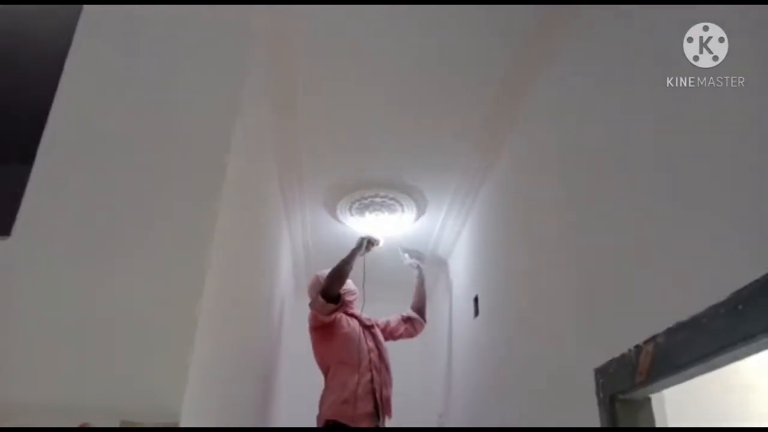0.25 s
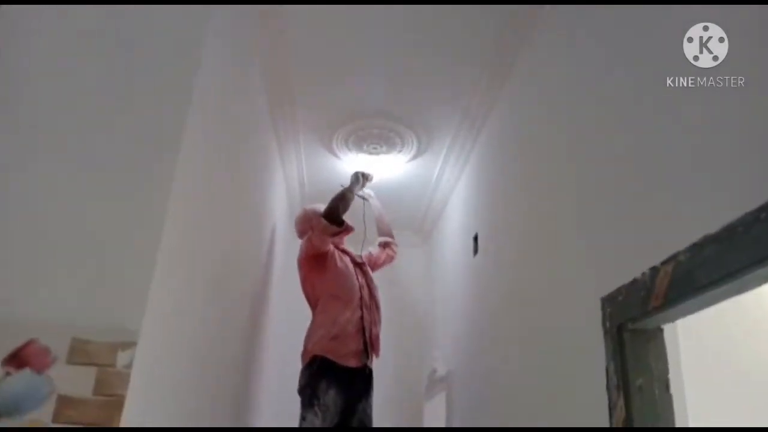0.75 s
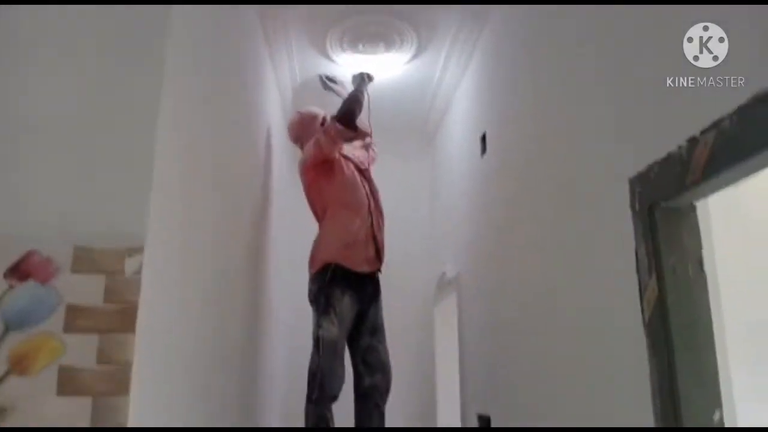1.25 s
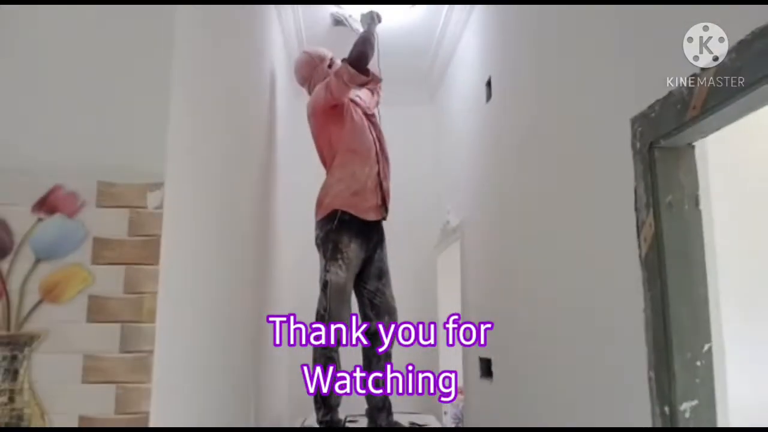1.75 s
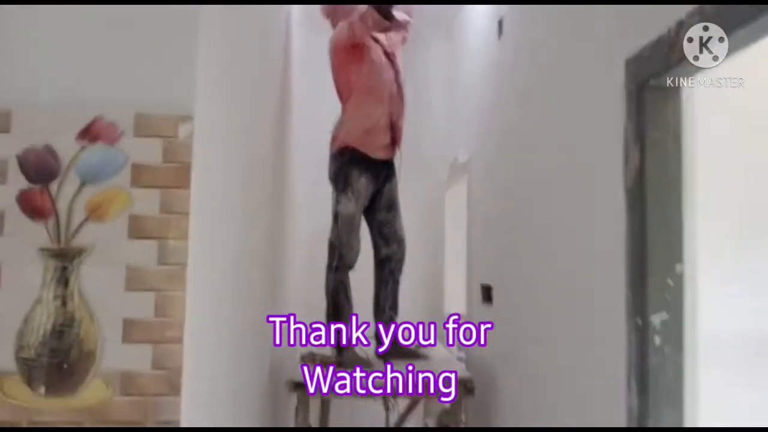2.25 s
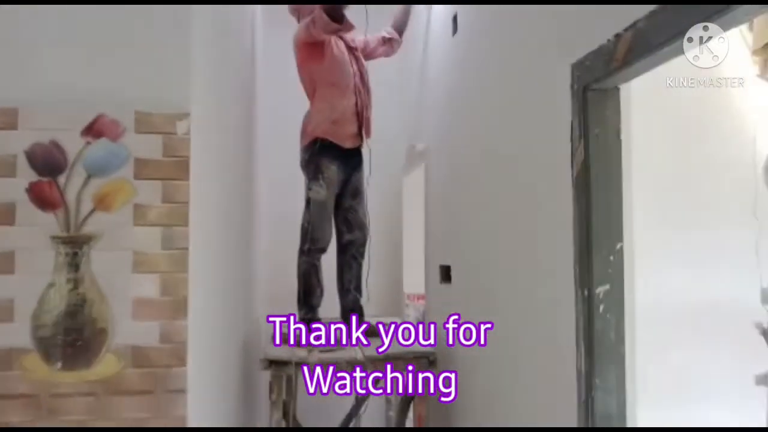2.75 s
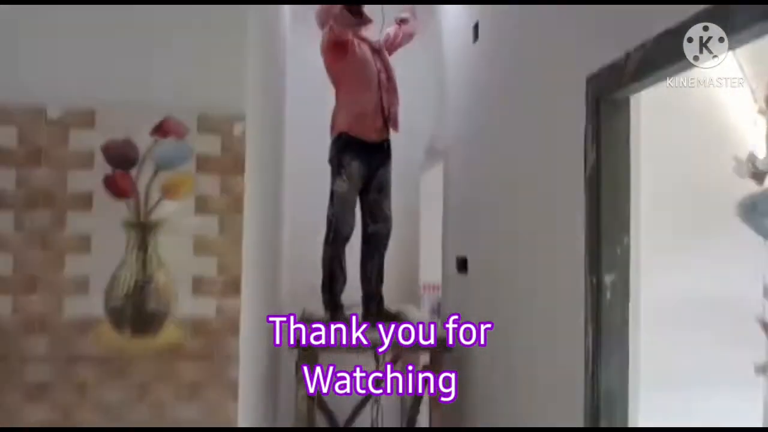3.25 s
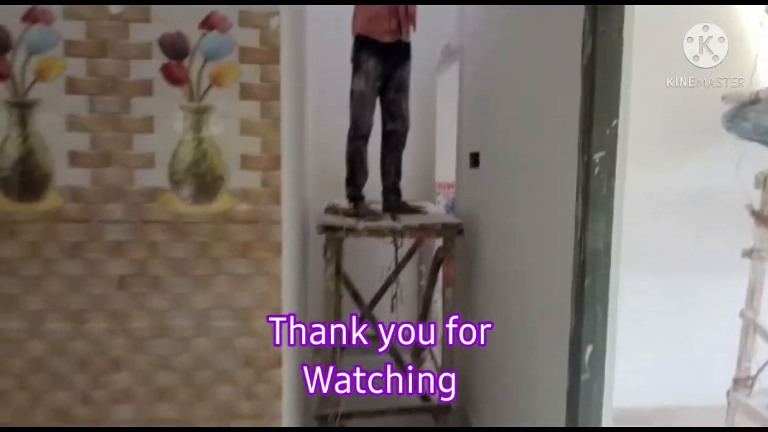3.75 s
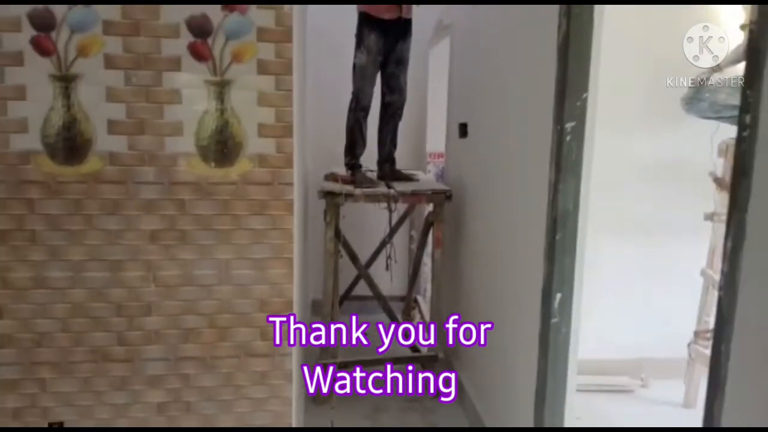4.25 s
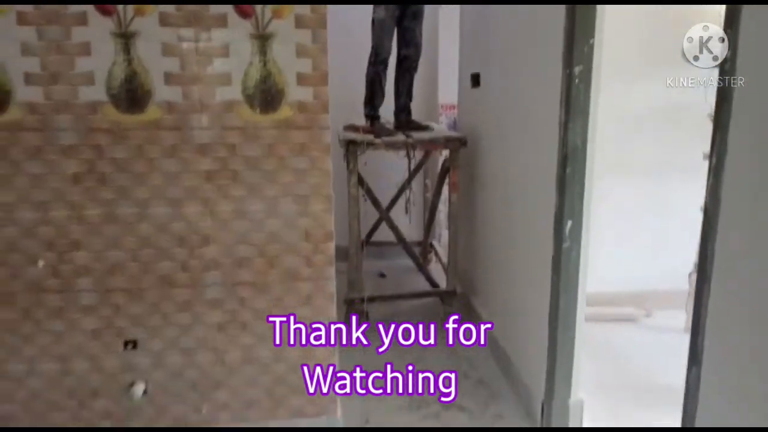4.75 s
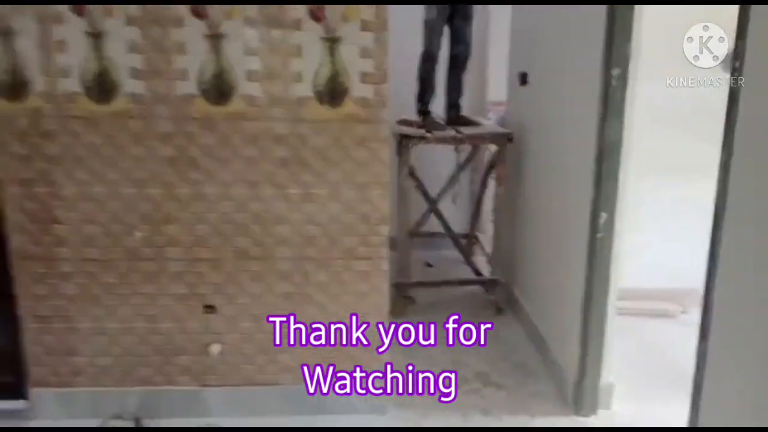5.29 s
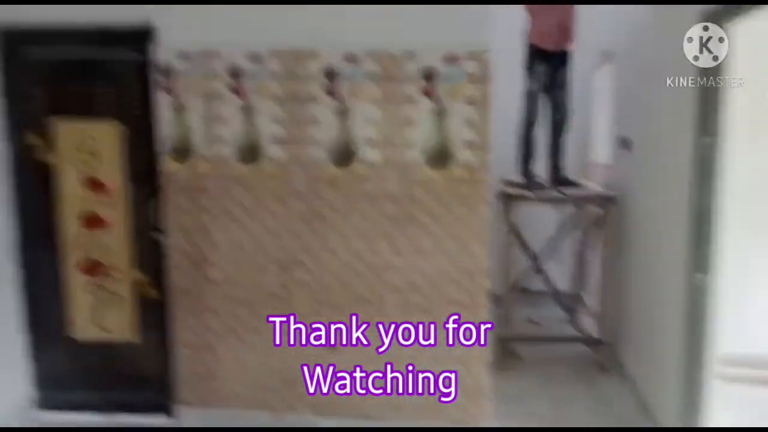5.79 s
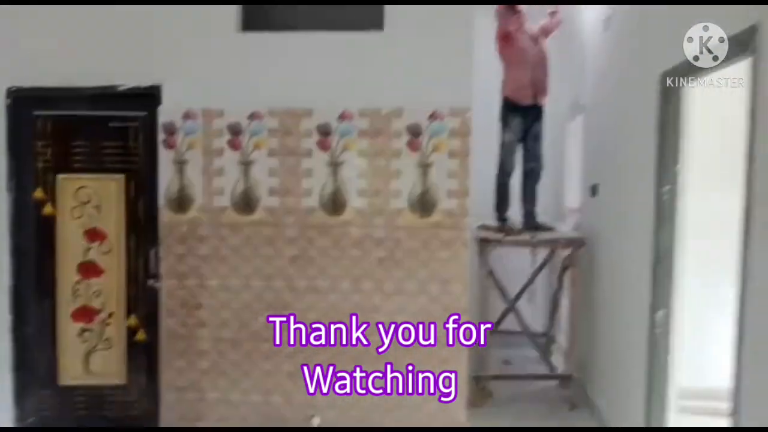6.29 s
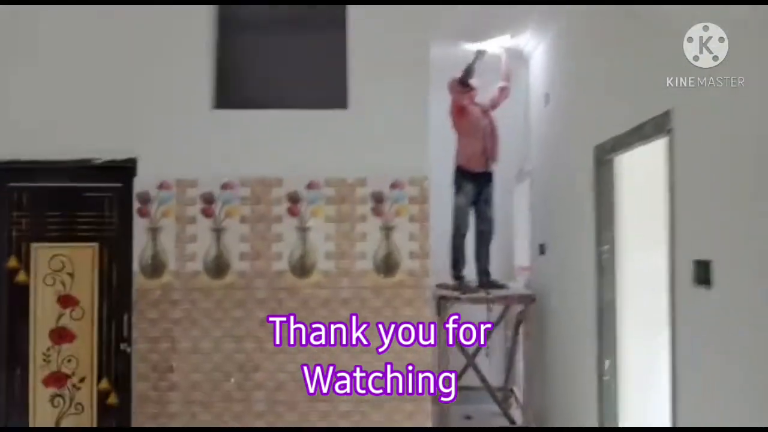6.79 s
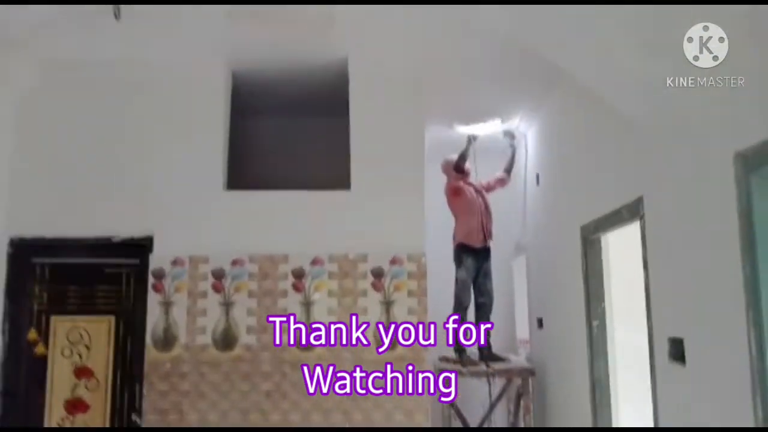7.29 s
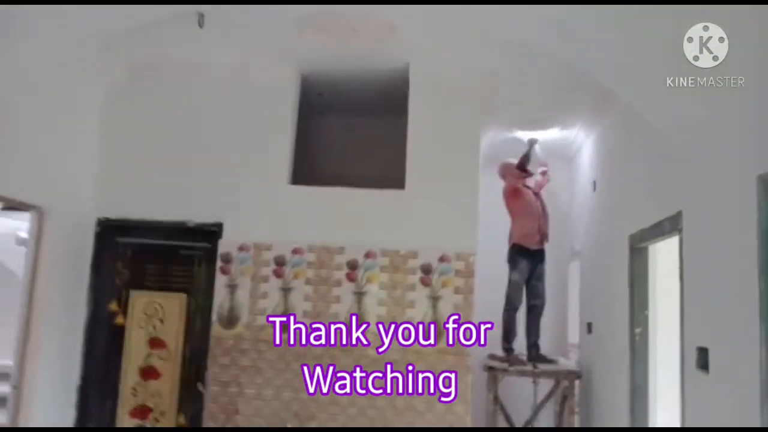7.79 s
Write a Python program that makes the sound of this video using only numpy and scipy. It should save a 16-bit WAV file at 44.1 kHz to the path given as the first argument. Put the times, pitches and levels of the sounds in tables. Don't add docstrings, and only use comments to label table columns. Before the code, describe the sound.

A bare plastered hall with hard echoes, heard in mono on a hand-held phone some metres from the work. At 0 s a sandpaper stroke is already ending, with low grip thuds. Until about 1.7 s only light scuffs, tiny grit ticks and a faint bump are heard over soft room air and low distant traffic with faint hoots and squeals. A rasp swells around 2 s, a fuller one at 2.5 s, then a lull near 3 s. From 3.5 to 5.5 s brisk, strong strokes come about every quarter second, gritty and bright. Around 5.7 s soft casing bumps begin, and by 6 s the rasp is muffled by a finger. At 6.25 s a sharp knuckle knock skids on the casing. Afterwards the scraping changes colour, with separate strokes at 6.7 and 7.1 s, and a weak last one near 7.9 s.

```python
import sys
import numpy as np
from scipy import signal
from scipy.fft import rfft, irfft
from scipy.io import wavfile
from scipy.ndimage import uniform_filter1d

SR = 44100
rng = np.random.default_rng(int(sys.argv[2]) if len(sys.argv) > 2 else 0)


def int16_out(signal):
    q = np.round(np.clip(np.atleast_2d(signal).T, -1, 1) * 32767)
    wavfile.write(sys.argv[1], SR, q.astype(np.int16))


def invert_db(level):
    return 10 ** (np.asarray(level, dtype=float) / 20)


N = 354123

# peak in seconds, rise and fall to 6 dB under it in seconds,
# force in dB, brightness in dB.
STROKES = [(0.034, 0.15, 0.044, -29.5, -1.5), (1.989, 0.17, 0.12, -36.5, -0.6),
           (2.529, 0.3, 0.12, -30.5, -2.4), (2.58, 0.16, 0.057, -38.5, 12), (3.367, 0.079, 0.026, -43, 0),
           (3.525, 0.042, 0.2, -33, -2.5), (3.68, 0.15, 0.102, -27.0, -0.2),
           (3.969, 0.098, 0.13, -26.5, -0.9), (4.228, 0.094, 0.093, -25.5, -0.5),
           (4.524, 0.11, 0.09, -26.5, -0.7), (4.76, 0.12, 0.087, -27, -0.4),
           (5.021, 0.12, 0.15, -26.5, 0.2), (5.31, 0.046, 0.25, -30.5, 3.5), (5.41, 0.26, 0.1, -28, -0.8),
           (5.86, 0.17, 0.18, -33, 1.8), (5.931, 0.009, 0.11, -36.5, -1), (6.213, 0.18, 0.018, -32.5, -0.5),
           (6.414, 0.07, 0.123, -39.5, 0), (6.67, 0.085, 0.19, -32.5, -1.3),
           (7.144, 0.18, 0.073, -32.5, -2), (7.718, 0.034, 0.096, -43.5, -4.5),
           (7.926, 0.2, 0.14, -38.5, -0.5)]
SCUFFS = [(0.44, 0.008, 0.046, -52.5, 0), (0.558, 0.006, 0.04, -58, 1), (0.647, 0.055, 0.047, -49.5, -0.2),
          (0.749, 0.009, 0.044, -62, -0.6), (1.059, 0.042, 0.057, -52, 0.5), (1.154, 0.026, 0.02, -60, -1),
          (1.377, 0.006, 0.757, -47.5, -2), (1.778, 0.27, 0.017, -45, 2), (3.083, 0.19, 0.15, -56, 1.5),
          (3.25, 0.008, 0.08, -52, 1.5), (7.68, 0.094, 0.053, -49.5, 1)]
STROKE_DROP_DB, STROKE_SQUARENESS, USUAL_FORCE_DB = 6.0, 2.33, -35
# steepness over speed, share of brightness, extra dB per dB of force,
# hall share 0-1, hall t60 in seconds.
LAYERS = [
    (.67, -1.3, -0.3841, 0.6, 0.97),
    (1.01, -0.091, 0.0134, 0.41, 0.89),
    (1.45, 0.97, 0.3746, 0.33, 0.7),
    (1.7, 1.14, 0.25, 0.45, 0.51),
]
# level facing the wall in dB, change when shaded in dB,
# change when turned in dB.
LAYERS_AT_PHONE = [
    (-6, -9, -2),
    (-0.12, 0.2, -0.25),
    (-1, -13, 6),
    (-10, -21.5, 6),
]
GRAINS_PER_S, GRAIN_SPREAD_DB, WET_DB = 5000, 0.5, -1.5
# time in seconds, share shaded 0-1, share turned aside 0-1.
PHONE_POSES = [(0.0, 0, .5), (.45, 0, 0), (5.69, 0, 0), (5.97, 1, 0), (6.18, 1, 0), (6.21, .83, .17),
               (6.3, 0, 1)]
# frequency in Hz, level in dB per Hz.
FACING = [(700, -33), (1480, -12), (2240, 0.5), (3200, -1), (4150, -2.5), (4600, -8), (5700, -11),
          (6410, -9), (7560, 2), (8320, -4), (9810, -16), (11200, -17), (14000, -10), (15200, -15.5)]
# frequency in Hz, level in dB per Hz.
SHADED = [(500, -47), (1050, -39), (1460, -23), (2000, -17.5), (2900, -4.5), (3700, 4.5), (4150, -1),
          (4600, -9), (5500, -12.5), (7600, -21), (10900, -31), (15200, -44)]
# frequency in Hz, level in dB per Hz.
ASIDE = [(290, -61), (500, -26), (704, -21), (898, -20), (1070, -21), (1150, -16), (1640, -8), (2210, -1),
         (3590, 2), (5360, -11), (8110, -1.5), (8960, -4), (10600, -12.5), (15200, -16.5)]
# frequency in Hz, t60 in seconds.
HALL_DECAY = [(300, 0.46), (2000, 0.75), (8000, 1), (15000, 0.59)]
HALL_FILLED = 1.4

# time in seconds, peak in dB, brightness in dB per octave.
BUMPS = [(1.371, -44, -1.5), (2.619, -44, -1.5), (5.768, -43, -3), (5.87, -41, -7), (5.904, -45, -1)]
# time in seconds, peak in dB.
KNUCKLE_SKID = [(6.23, -18.5), (6.236, -21), (6.243, -12.5), (6.246, -11.5), (6.254, -28), (6.258, -19.5),
                (6.263, -24), (6.269, -21), (6.273, -19), (6.286, -34), (6.299, -45)]
SKID_BRIGHT_DB, SKID_BRIGHT_PER_DB, SKID_USUAL_DB = -2.5, 0.06, -20
# frequency in Hz, level in dB per Hz.
CASING = [(24, -46), (40, -27), (285, -9.5), (572, -6), (733, -11), (916, -10.5), (3420, -14.5),
          (4850, -22), (7770, -15.5), (15200, -21)]
BUMP_T60_S, THUD_S = 0.037, 0.039
# time in seconds, peak in dB, push time in seconds.
TAPS = [(5.773, -31, .0004), (5.874, -36, .00045), (6.2478, -14, 0.00054)]
# time in seconds, peak in dB, frequency in Hz.
THUDS = [(.005, -49, 95), (.045, -40.5, 74.5), (.1, -54, 80), (.203, -46, 73), (.25, -51, 75),
         (.283, -47, 84), (.33, -45.5, 75), (5.657, -54, 89), (5.76, -55, 85), (5.87, -61, 110),
         (6.042, -59, 73)]
# time in seconds, peak in dB, frequency in Hz.
PINGS = [(1.407, -34, 7500), (3.034, -40.5, 9100)]
# time in seconds, peak in dB.
FLOOR_TICKS = [(0.4369, -38), (0.555, -36), (1.3747, -30), (1.3784, -44), (3.2446, -33)]

# loudest moment in seconds, approach in seconds, fade in dB per second, level in dB.
VEHICLES = [(0.02, 0.037, 45, -44), (.69, .08, 60, -55.5), (1.42, 0.02, 23, -48.5), (2.2, 0.52, 17, -50.5),
            (2.63, 0.022, 45, -44), (3.12, .2, 21, -58), (3.6, 0.11, 15, -58), (4.0, 0.6, 20, -55.5),
            (4.6, .12, 12, -54.5), (5.05, .2, 61, -58), (5.5, 0.092, 60, -48), (6.9, .3, 25, -69),
            (7.72, 0.038, 29, -52)]
STREET_REST_DB, APPROACH_DB = -74.5, 8.5
# frequency in Hz, level in dB per Hz.
STREET_TONE = [(24, -45), (40, -19), (128, -5), (407, -4), (469, -3.5), (533, -5.5), (699, -1.5),
               (1200, -1.5), (1560, -1), (2640, -120)]
# start in seconds, end in seconds, frequency in Hz,
# width in Hz, level in dB.
HOOTS = [(1.85, 2.3, 697, 18, -59.5), (2.65, 3.496, 670, 14, -66), (2.9, 3.3, 985, 20, -66),
         (4.49, 4.85, 830, 70, -56.5), (.58, 0.84, 490, 15, -65), (6.98, 7.25, 1100, 220, -54),
         (4.8, 5.12, 730, 60, -62), (1.85, 1.99, 478, 29, -61.5), (2.6, 2.9, 138, 25, -62),
         (2.3, 2.82, 1680, 160, -46), (3.0, 3.22, 1600, 30, -66), (1.39, 1.62, 2350, 500, -47),
         (1.66, 1.9, 1680, 120, -50), (1.02, 1.12, 2750, 400, -56)]
# frequency in Hz, level in dB per Hz.
AIR = [(15, -44), (25, -10), (93, -1.5), (147, -1), (203, -4), (258, -3), (817, -8.5), (2090, -3),
       (3570, -7), (5490, -21.5), (6620, -19.5), (7770, -12), (11300, -32), (15200, -30)]
AIR_DB, AIR_SHADE_DB = -53.5, -1.5
EDGE_HZ, FLAT_HZ = 15490, 15200


def evened(x):
    return x / np.sqrt(np.mean(x ** 2) + 1e-20)


def read(points, hz):
    f, value = np.transpose(points)
    return np.interp(np.log(np.minimum(hz, FLAT_HZ) + 1), np.log(f + 1), value)


def add(mix, s, sound):
    part = mix[round(s * SR):][:len(sound)]
    part += sound[:len(part)]


def patches(shape, wide, long):
    field = uniform_filter1d(rng.standard_normal(shape), wide, 0)
    return evened(uniform_filter1d(field, long, 1))


def noise(points, patchy_db):
    hz, t, z = signal.stft(rng.standard_normal(N), SR, nperseg=2048)
    z = z * invert_db(read(points, hz)[:, None] + patchy_db * patches(z.shape, 5, 6))
    return evened(signal.istft(z, SR, nperseg=2048)[1][:N])


def sandpaper():
    spread_db = GRAIN_SPREAD_DB * np.minimum(rng.exponential(1, N), 4)
    size = invert_db(spread_db) * rng.choice([-1., 1.], N)
    grit = evened(size * (rng.random(N) < GRAINS_PER_S / SR))
    hz, t, z = signal.stft(evened(grit + invert_db(WET_DB) * hall(grit)), SR, nperseg=256, noverlap=192)

    s, *columns = np.transpose(PHONE_POSES)
    shaded, turned = (np.clip(np.interp(t, s, c), 0, 1) for c in columns)
    colours = np.transpose([read(c, hz) for c in (FACING, SHADED, ASIDE)])
    colour_db = colours @ [1 - shaded - turned, shaded, turned]

    bands = [(1200, 2400), (2400, 5000), (6000, 10000), (11500, 15300)]
    centres = np.log([1700, 3600, 7500, 13000])
    blend = np.transpose([np.interp(np.log(hz + 1), centres, one) for one in np.eye(4)])
    levels = np.array(stroke_levels(t, shaded, turned))
    for _ in range(3):
        shares = [(invert_db(colour_db[(hz >= lo) & (hz < hi)]) ** 2).sum(0) / len(hz) for lo, hi in bands]
        colour_db = colour_db + blend @ (levels - 10 * np.log10(shares))

    uneven_paper = 0.85 * patches(z.shape, 5, 40)
    shaky_hand = 0.24 * patches((1, len(t)), 1, 12)
    colour_db += uneven_paper + shaky_hand
    return signal.istft(z * invert_db(colour_db), SR, nperseg=256, noverlap=192)[1][:N]


def stroke_levels(t, shaded, turned):
    peak, rise, fall, force_db, bright_db = np.transpose(STROKES + SCUFFS)[..., None]
    before = (peak - t) / np.maximum(rise, .005)
    after = (t - peak) / np.maximum(fall, .005)
    off = np.where(t < peak, before, after) ** STROKE_SQUARENESS
    levels = []
    for layer, at_phone in zip(LAYERS, LAYERS_AT_PHONE):
        steep, lean, firm, share, t60 = layer
        facing_db, shaded_db, turned_db = at_phone
        firm_db = firm * (force_db - USUAL_FORCE_DB)
        stroke_db = force_db + firm_db + lean * bright_db - STROKE_DROP_DB * steep * off
        power = (invert_db(stroke_db) ** 2).sum(0)
        keep = invert_db(-120 * (t[1] - t[0]) / t60)
        share = np.clip(share, 0, 1)
        echo = signal.lfilter([1 - keep], [1, -keep], power, zi=[keep * power[0] * HALL_FILLED])[0]
        power = (1 - share) * power + share * echo
        pose_db = facing_db + shaded_db * shaded + turned_db * turned
        levels.append(10 * np.log10(power + 1e-12) + pose_db)
    return levels


def hall(x):
    out = np.zeros(N)
    at = np.arange(200, SR - 20, 20)
    place = np.arange(N) / SR // .025 % 8
    for k in range(8):
        taps = np.zeros(SR)
        taps[at + rng.integers(0, 20, len(at))] = rng.choice([-1., 1.], len(at))
        hz, t, z = signal.stft(taps, SR, nperseg=256)
        decay = invert_db(-60 * t / read(HALL_DECAY, hz)[:, None])
        tail = signal.istft(z * decay, SR, nperseg=256)[1]
        out += signal.fftconvolve(x * (place == k), tail / np.linalg.norm(tail))[:N]
    return out


def handling():
    out, t = np.zeros(N), np.arange(4096) / SR
    hz = np.fft.rfftfreq(len(t), 1 / SR)

    def burst(colour_db):
        return evened(irfft(rfft(rng.standard_normal(len(t))) * invert_db(colour_db)))

    skid = [(s, db, SKID_BRIGHT_DB + SKID_BRIGHT_PER_DB * (db - SKID_USUAL_DB)) for s, db in KNUCKLE_SKID]
    for s, db, bright_db in BUMPS + skid:
        tilt_db = bright_db * np.log2(hz / 500 + .1) - 6.0 * (hz > 12000)
        knock = burst(read(CASING, hz) + tilt_db)
        add(out, s, invert_db(db - 2.5 - 60 * t / BUMP_T60_S) * knock * np.minimum(t / 0.003, 1))
    for s, db, push in TAPS:
        add(out, s, invert_db(db) * np.e * t / push * (1 - t / push / 2) * np.exp(-t / push))
    for s, db, f in THUDS:
        swell = np.sin(np.pi * np.minimum(t / THUD_S, 1))
        add(out, s, invert_db(db) * np.sin(2 * np.pi * f * t) * swell)
    for s, db, f in PINGS:
        add(out, s, invert_db(db - 60 * t / 0.011) * np.sin(2 * np.pi * f * t) * np.minimum(t / 0.0011, 1))
    for s, db in FLOOR_TICKS:
        rattle = burst(read(AIR, hz) - 30 * (hz < 900))
        tick_and_echo = invert_db(-60 * t / 0.012) + 0.089 * invert_db(-60 * t / .2)
        add(out, s, invert_db(db - 9.5) * rattle * tick_and_echo)
    return out


def street():
    out = traffic_level() * noise(STREET_TONE, patchy_db=3.0)
    for start, end, hz, width, db in HOOTS:
        count = round((end - start) * SR)
        r = np.exp(-np.pi * width / SR)
        fuzz = signal.lfilter([1], [1, -2 * r, r * r], rng.standard_normal((2, SR))[:, :count])
        carrier = np.exp(2j * np.pi * hz * np.arange(count) / SR)
        tone = ((fuzz[0] + 1j * fuzz[1]) * carrier).real
        add(out, start, invert_db(db) * evened(tone) * signal.windows.tukey(count, .25))
    return out


def traffic_level():
    t = np.arange(N)[::64] / SR
    loudest, approach, fade, db = np.transpose(VEHICLES)[..., None]
    under_db = np.where(t < loudest, APPROACH_DB * (loudest - t) / approach, fade * (t - loudest))
    power = (invert_db(db - under_db) ** 2).sum(0) + invert_db(STREET_REST_DB) ** 2
    return np.interp(np.arange(N) / SR, t, np.sqrt(power))


def hall_air():
    s, shaded, turned = np.transpose(PHONE_POSES)
    shade = np.interp(np.arange(N) / SR, s, shaded)
    return invert_db(AIR_DB + AIR_SHADE_DB * shade) * noise(AIR, patchy_db=1.5)


def scene():
    mix = sandpaper() + handling() + street() + hall_air()
    return np.array([mix, mix])


def low_pass(x):
    return signal.sosfilt(signal.butter(12, 16800, fs=SR, output="sos"), x)


def record(dry):
    bass_cut = signal.butter(3, 50, "high", fs=SR, output="sos")
    mix = signal.sosfilt(bass_cut, dry)
    top_cut = signal.firwin(4095, EDGE_HZ, window=("kaiser", 11), fs=SR)
    mix = signal.oaconvolve(mix, top_cut[None], "same")
    return low_pass(mix)


dry = scene()
out = record(dry)
int16_out(out)
```